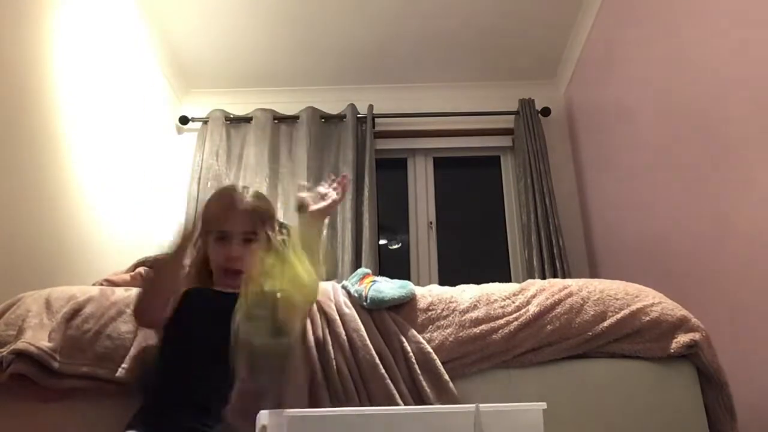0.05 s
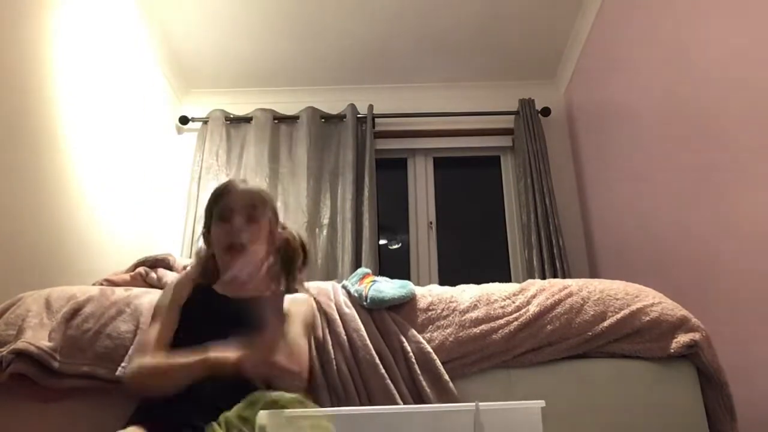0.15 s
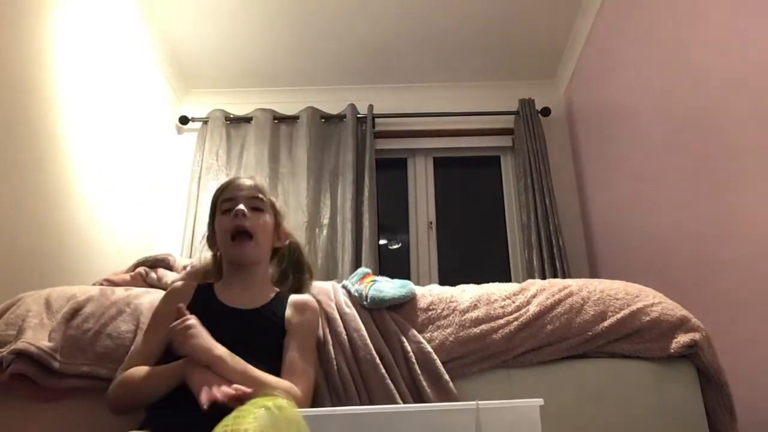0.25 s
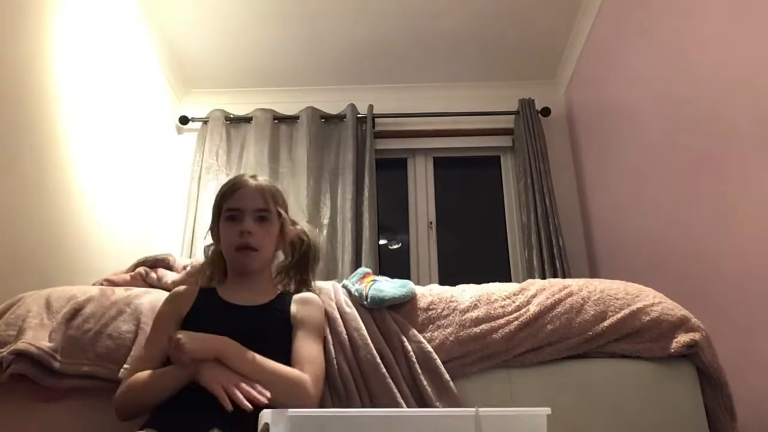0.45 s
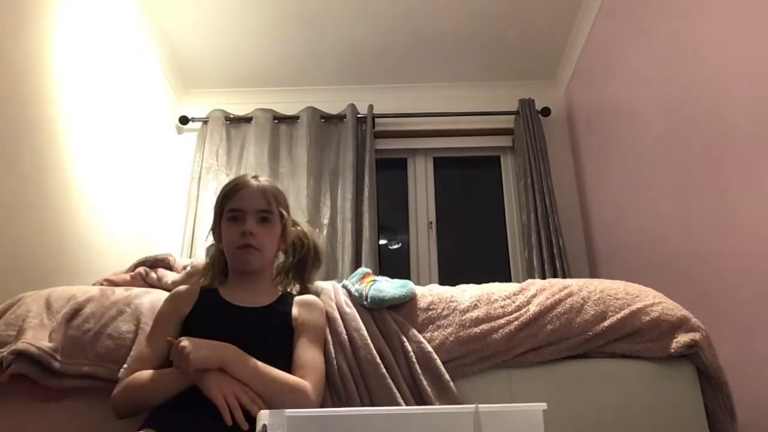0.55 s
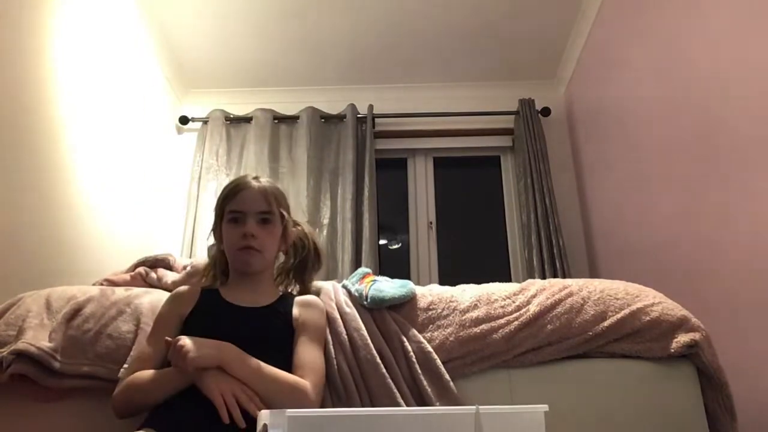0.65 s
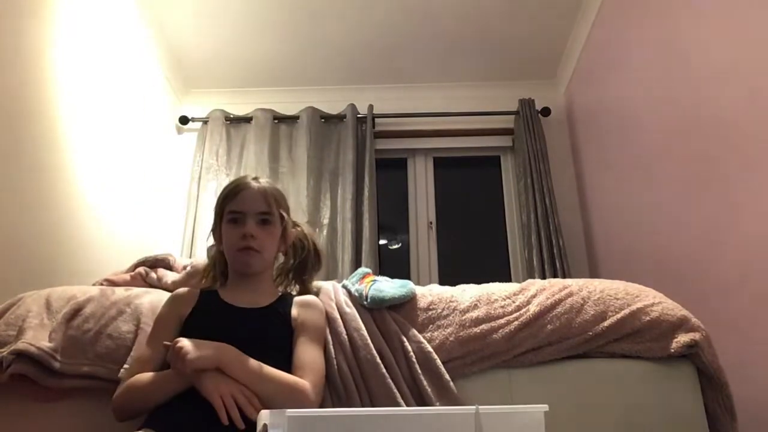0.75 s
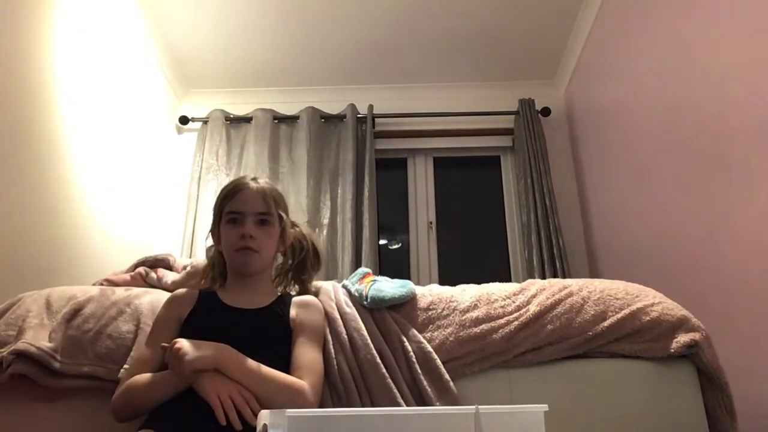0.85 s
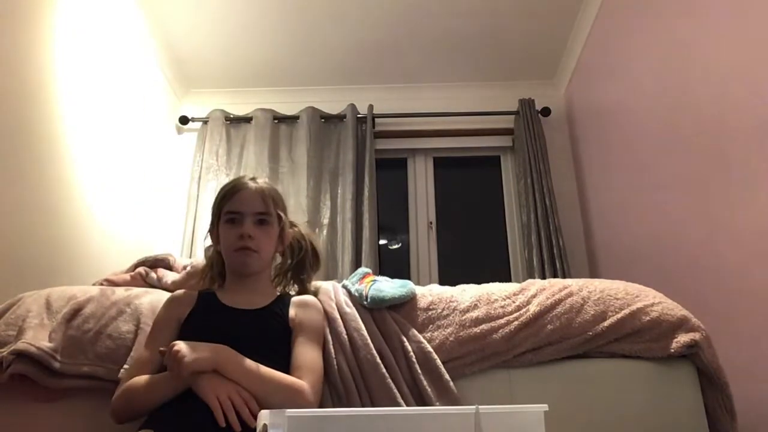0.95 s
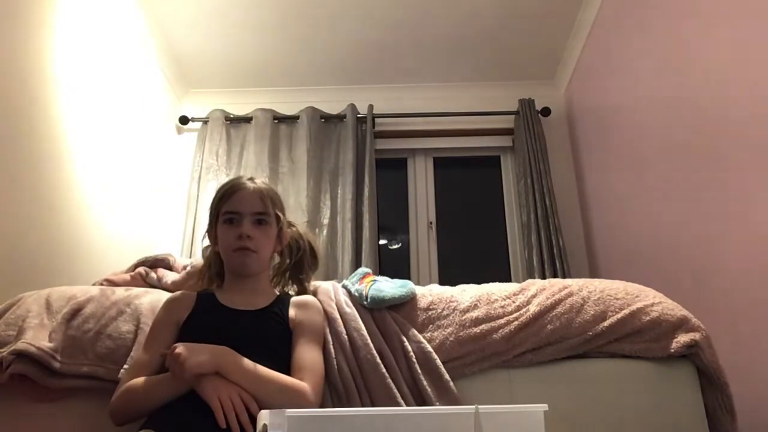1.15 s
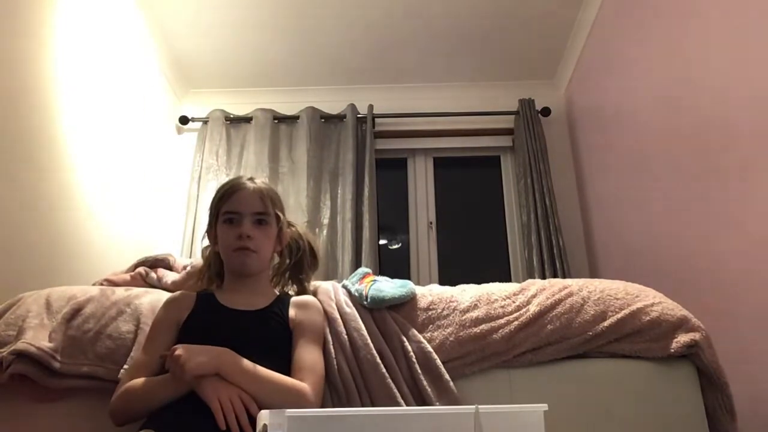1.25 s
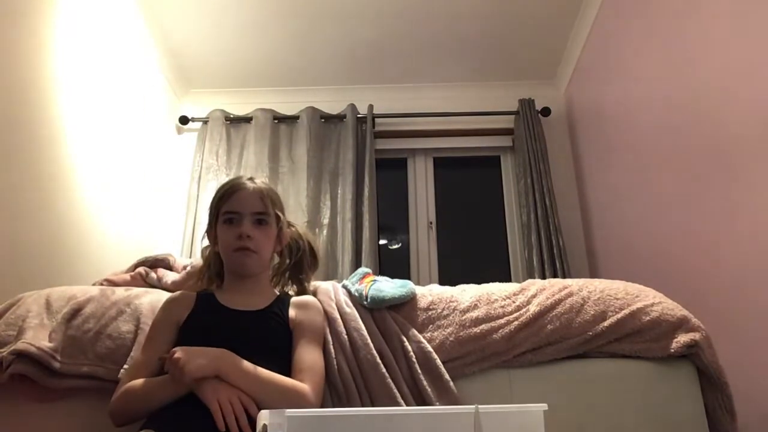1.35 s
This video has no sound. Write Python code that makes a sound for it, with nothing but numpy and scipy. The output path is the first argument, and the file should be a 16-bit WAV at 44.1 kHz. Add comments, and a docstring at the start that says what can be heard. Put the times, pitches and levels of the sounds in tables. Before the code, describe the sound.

Close up in a small bedroom, loose plastic turns rattle and thump, slam together on a hollow box in a tight clattering run, then fade through dull bumps and faint rustles to near silence.

```python
"""A plastic coil toy is swung down onto a hollow plastic box in a bedroom, close to the microphone.
First its turns chatter, made of random touches and single snaps. Jolts run along the coil, treble ahead
of bass, and arrive as short falling thumps. It lands with a sharp clack of noise and a run of hollow
knocks that ring the box. Then it settles with soft bumps and faint rustles while the coil rings on.
Low rubbing and a quiet room floor, both of coloured noise, lie underneath."""
import sys
import numpy as np
from scipy import signal
from scipy.fft import rfft, irfft
from scipy.io import wavfile

SR = 44100
rng = np.random.default_rng(int(sys.argv[2]) if len(sys.argv) > 2 else 0)


def wrap_up_sound(samples):
    """Save the sound to the file named by the first command line argument, as 16-bit audio."""
    columns = np.atleast_2d(samples).T
    # keep every value between -1 and 1, then stretch to whole-number steps
    tamed = np.clip(columns, -1, 1)
    steps = np.round(tamed * 32767).astype(np.int16)
    wavfile.write(sys.argv[1], SR, steps)


N = 61739
T = np.arange(N) / SR   # time of each sample, s
HZ = np.maximum(np.arange(N + 1) * SR / (2 * N), 1)   # pitch of each spectrum bin, kept above zero
TICK_T60_S = 0.0073   # a light contact falls by 60 dB in this time


def from_db(db):
    """Decibels to gain."""
    return 10 ** (np.asarray(db) / 20)


def rms_one(x):
    """Scale to rms 1."""
    return x / np.sqrt(np.mean(x ** 2) + 1e-20)


def at_hz(points, hz, axis=1):
    """Read a column of a table on a log-frequency axis."""
    rows = np.array(points)
    return np.interp(np.log(hz), np.log(rows[:, 0]), rows[:, axis])


def level(curve):
    """Gain over time from (start_s, level_db) points."""
    return from_db(np.interp(T, *np.transpose(curve)))


def colour(x, spectrum):
    """Filter with the given spectrum, without any sound ahead of its cause."""
    cepstrum = irfft(np.log(from_db(at_hz(spectrum, HZ))))
    # folding the cepstrum forward in time gives the minimum-phase filter
    cepstrum[1:N] *= 2
    cepstrum[N + 1:] = 0
    response = np.exp(rfft(cepstrum))
    return irfft(rfft(x, 2 * N) * response)[:N]


def convolve(x, response):
    """Pass a sound through an impulse response."""
    return signal.fftconvolve(x, response)[:N]


def burst(s, t60):
    """Noise that starts at s and falls by 60 dB in t60 seconds."""
    fade = from_db(-60 * np.maximum(T - s, 0) / t60)
    return rng.standard_normal(N) * (T >= s) * fade


def chatter():
    """Turns touch at random in flurries, as hard as the coil is shaken; a few snaps stand out."""
    # how hard the turns chatter: start_s, level_db (relative)
    shake_points = [(0, -45.5), (0.016, -55), (0.027, -43), (0.056, -49), (0.085, -51), (0.145, -55),
                    (0.159, -37.5), (0.19, -41), (0.28, -38.5), (0.308, -35), (0.364, -39.5), (0.476, -51),
                    (0.58, -56), (0.67, -58), (0.76, -66), (0.82, -69.5), (0.93, -81.5)]
    # faint shifts of the resting coil: middle_s, level_db (relative)
    rustle_times = [(0.97, -67), (1.39, -78.5)]
    # single turns snapping together: start_s, level_db (relative)
    snap_times = [(0.0245, -25.5), (0.0258, -43), (0.0443, -48), (0.077, -29), (0.118, -32), (0.1585, -27),
                  (0.165, -42), (0.179, -37), (0.2021, -25), (0.219, -22), (0.287, -25), (0.2941, -26),
                  (0.325, -11), (0.523, -31), (0.574, -42), (0.608, -63), (0.654, -51.5), (0.946, -51.5),
                  (0.962, -50.5)]
    # colour of the turns touching: pitch_hz, level_db (relative)
    turn_colour = [(300, -8), (600, -7), (1000, -16.5), (1900, -8), (2400, -13), (3100, -2), (4600, -3),
                   (6100, -5), (6750, 6), (7600, -3), (10500, -0.5), (12000, -4.5), (15500, -2.5)]
    touches_per_s, rustle_s = 1800, 0.024
    flutter_db, flutter_per_s = 3, 150   # random changes in touch strength

    signs = rng.choice([-1, 1], N)
    flutter = np.interp(T * flutter_per_s, np.arange(N), rng.standard_normal(N))
    happens = rng.random(N) < touches_per_s / SR
    touches = rms_one(colour(from_db(flutter_db * flutter) * signs * happens, turn_colour))

    shake = level(shake_points)
    for middle_s, level_db in rustle_times:
        shake = shake + from_db(level_db) * np.exp(-((T - middle_s) / rustle_s) ** 2)
    snaps = sum(from_db(level_db) * burst(start_s, TICK_T60_S) for start_s, level_db in snap_times)
    return from_db(-0.5) * shake * touches + from_db(-3.5) * colour(snaps, turn_colour)


def knocks():
    """Each blow cracks at the contact and rings the modes (natural tones) of the box."""
    # the coil strikes the box: start_s, ring_db (hollow), crack_db (hard), both relative
    strikes = [(0.1966, -24, -35), (0.2025, -26.5, -27.5), (0.2063, -27, -23), (0.3059, -27.5, -13),
               (0.3097, -15.5, -18), (0.320, -27, -21), (0.3365, -16, -15.5), (0.3486, -10.5, -15.5),
               (0.3529, -10.5, -18), (0.3568, -19, -15.5), (0.365, -20.5, -14), (0.3755, -17, -15.5),
               (0.387, -27, -21), (0.398, -24, -18), (0.412, -31, -48), (0.452, -54, -35.5),
               (0.702, -39.5, -52), (0.713, -42, -48.5), (1.329, -58, -81.5)]
    # modes of the box: pitch_hz, level_db (relative), t60_s
    box_modes = [(133.5, -18, 0.18), (215, -6, 0.061), (276, -6, 0.14), (371.3, -1.5, 0.084),
                 (470.5, 1.5, 0.074), (615, -4, 0.12), (676, -4, 0.064), (810, -14, .04), (912, -14, .07),
                 (1262, -15.5, 0.05), (1355, -16.5, 0.079), (1749, -19.5, 0.038), (1976, -19, 0.055),
                 (2925, -17.5, 0.073)]
    # colour of a hard contact: pitch_hz, level_db (relative)
    crack_colour = [(200, 9), (700, 10), (1300, 5.5), (1650, 2.5), (2000, 6), (2550, -3), (3050, 4),
                    (4300, 2), (5800, -3.5), (7000, -2), (9500, -12.5), (15500, -20.5)]
    crack_t60_s = 0.01
    crunch_db, crunch_t60_s = -13.5, 0.16   # turns pile up after each blow; level is relative to the crack

    blows, cracks = np.zeros(N), 0
    for start_s, ring_db, crack_db in strikes:
        # a one-sample push, shared between the two nearest samples
        blows += from_db(ring_db) * np.maximum(1 - np.abs(T - start_s) * SR, 0)
        crack = burst(start_s, crack_t60_s)
        crunch = from_db(crunch_db) * burst(start_s, crunch_t60_s)
        cracks = cracks + from_db(crack_db) * (crack + crunch)

    box = np.zeros(N)
    for k, (pitch_hz, level_db, t60_s) in enumerate(box_modes):
        fade = from_db(level_db - 60 * T / t60_s)
        box += (-1) ** k * fade * np.sin(2 * np.pi * pitch_hz * T)   # neighbours move in opposite directions
    return from_db(-4) * convolve(blows, box) + from_db(-4.5) * colour(cracks, crack_colour)


def clack():
    """The stack of turns snaps together with a short bright ring."""
    # the turns slam shut: start_s, level_db (relative)
    slams = [(0.3058, -6.5), (0.3092, -12.5), (0.319, -21.5)]
    # colour of the clack: pitch_hz, level_db (relative)
    slam_colour = [(400, -9.5), (1300, -8), (2500, -8), (3400, -2.5), (4300, 11.5), (5400, -1), (6800, 5.5),
                   (8300, -2), (11000, -12.5), (16000, -12.5)]
    slam_t60_s = 0.0059
    noise = sum(from_db(level_db) * burst(start_s, slam_t60_s) for start_s, level_db in slams)
    return from_db(-4) * colour(noise, slam_colour)


def jolts():
    """Bending waves: delay falls with the root of frequency, so each push is a falling chirp and its echo."""
    # jolts that travel along the coil: start_s, level_db (relative), brightness_hz
    push_times = [(0.123, -1.5, 295), (0.191, 1, 171), (0.237, 0.5, 146.5), (0.277, 0.5, 230),
                  (0.34, 10, 200), (0.37, 1.5, 260), (0.44, -16, 160), (0.501, -15, 169), (0.683, 4, 135),
                  (0.717, -12, 131.6), (0.762, -11.5, 130)]
    travel_s, travel_at_hz = 0.034, 100.97   # travel time of a wave of this pitch
    lowest_hz, plastic_loss_hz = 75, 960   # bass limit; higher waves are absorbed on the way
    return_s, return_db = 0.027, -8.5   # the wave comes back from the far end

    pushes = 0
    for start_s, level_db, brightness_hz in push_times:
        shift = np.exp(-2j * np.pi * HZ * start_s)   # moves the push to its start time
        pushes = pushes + from_db(level_db) * shift / (1 + (HZ / brightness_hz) ** 3.2)
    travel = np.exp(-4j * np.pi * travel_s * np.sqrt(travel_at_hz * HZ))
    echo = 1 + from_db(return_db) * np.exp(-2j * np.pi * HZ * return_s)
    bass_limit = 1 / np.sqrt(1 + (lowest_hz / HZ) ** 10)
    damping = np.exp(-(HZ / plastic_loss_hz) ** 2)
    return from_db(21) * irfft(pushes * travel * echo * bass_limit * damping)[:N]


def bumps():
    """Soft contacts of the settling coil swell and fade near the lowest pitch of the box."""
    # soft bumps: start_s, level_db
    bump_times = [(0.519, -39.5), (0.601, -33.5), (0.651, -42), (0.966, -56)]
    pitch_hz, rise_s = 127.1, 0.015
    out = 0
    for start_s, level_db in bump_times:
        age = np.maximum(T - start_s, 0)
        swell = age / rise_s
        envelope = (swell * np.exp(1 - swell)) ** 2   # peaks at 1 after the rise time
        out = out + from_db(level_db) * envelope * np.sin(2 * np.pi * pitch_hz * age)
    return out


def ringing(contacts):
    """Every contact leaves the coil ringing faintly in clusters of close modes."""
    # clusters of close modes: pitch_hz, half_width_hz, level_db (relative)
    mode_clusters = [(1957, 110, -23), (2910, 180, -19.5), (3400, 280, -18), (5100, 800, -15),
                     (6600, 460, -21)]
    # light taps that only set the coil ringing: start_s, level_db (relative)
    tap_times = [(0.134, -7.5), (0.688, -14), (0.963, -27.5), (1.372, -28)]
    coil_t60_s = 0.72

    clusters = 0
    for pitch_hz, half_width_hz, level_db in mode_clusters:
        band = 1 / (1 + ((HZ - pitch_hz) / half_width_hz) ** 4)
        noise = irfft(rfft(rng.standard_normal(2 * N)) * band)
        clusters = clusters + from_db(level_db) * rms_one(noise)[:N]
    decay = rms_one(from_db(-60 * T / coil_t60_s)) / np.sqrt(N)
    taps = sum(from_db(level_db) * burst(start_s, TICK_T60_S) for start_s, level_db in tap_times)
    return from_db(-14.5) * convolve(contacts + taps, clusters * decay)


def rubbing():
    """Low noise of the coil rubbing in the hand and on the box."""
    # strength of the rubbing: start_s, level_db
    rub_points = [(0, -70.5), (0.045, -62.5), (0.062, -53), (0.083, -46), (0.12, -52.5), (0.16, -48),
                  (0.25, -42.5), (0.29, -55), (0.43, -44.5), (0.5, -53.5), (0.59, -55), (0.68, -59),
                  (0.72, -49.5), (0.77, -55.5), (0.85, -64.5), (1.0, -69), (1.4, -75)]
    # colour of the rubbing: pitch_hz, level_db (relative)
    rub_colour = [(60, -12.5), (140, 3), (220, -2.5), (400, 4.5), (680, -0.5), (950, -12.5), (2000, -22),
                  (4000, -35)]
    return level(rub_points) * rms_one(colour(rng.standard_normal(N), rub_colour))


def bedroom(x):
    """Near reflections, then a diffuse tail that dies at its own rate in each band."""
    # bedroom reverberation: pitch_hz, level_db (relative), t60_s
    room_tail = [(100, -15.5, .35), (400, -19.5, 0.15), (1220, -11, 0.28), (3560, -13.5, 0.24),
                 (7000, -14, 0.44), (14000, -8.5, .4)]
    early_db, early_t60_s, wall_delay_s = -8.5, 0.027, 0.004
    response = rms_one(burst(wall_delay_s, early_t60_s)) * from_db(early_db) / np.sqrt(N)
    edges = np.geomspace(60, 17000, 9)   # eight bands, each about an octave wide
    for low, high in zip(edges, edges[1:]):
        middle_hz = np.sqrt(low * high)
        t60_s = at_hz(room_tail, middle_hz, axis=2)
        gain = from_db(at_hz(room_tail, middle_hz)) / np.sqrt(N)
        tail = gain * rms_one(burst(2 * wall_delay_s, t60_s))
        band = signal.butter(2, [low, high], "band", fs=SR, output="sos")
        response = response + signal.sosfilt(band, tail)
    return x + convolve(x, response)


def room_floor():
    """Steady, mostly low noise of the still room."""
    # colour of the still room: pitch_hz, level_db (relative)
    floor_colour = [(25, -22.5), (48, -18.5), (68, -4.5), (105, 0), (166, -12), (300, -16), (620, -29),
                    (1000, -37.5), (3200, -38), (8000, -44), (16000, -55)]
    return from_db(-63) * rms_one(colour(rng.standard_normal(N), floor_colour))


def scene():
    """The toy in the room, over rubbing and a quiet floor."""
    contacts = chatter() + knocks() + clack()
    in_room = bedroom(contacts + jolts() + bumps())
    return (in_room + ringing(contacts) + rubbing() + room_floor())[None]


def record(dry):
    """The microphone drops the deep bass; the top is cut."""
    bass_cut = signal.butter(4, 55, "high", fs=SR, output="sos")
    top_cut = signal.ellip(10, 0.2, 70, 16100, fs=SR, output="sos")   # steep low-pass at 16100 Hz
    thin = signal.sosfilt(bass_cut, dry)
    return signal.sosfilt(top_cut, thin)


dry = scene()
out = record(dry)
wrap_up_sound(out)
```